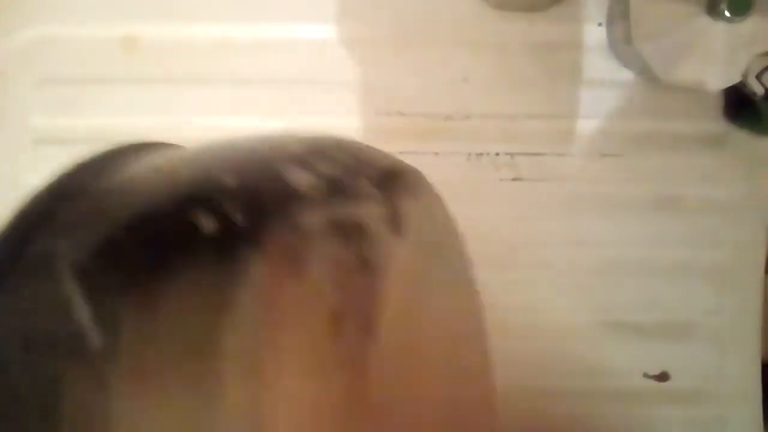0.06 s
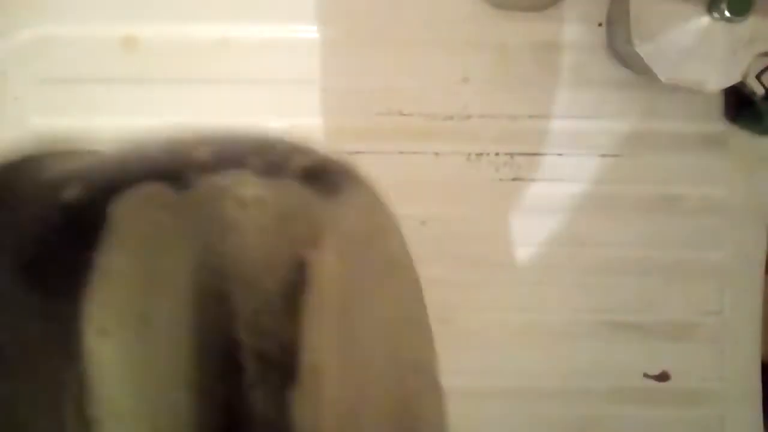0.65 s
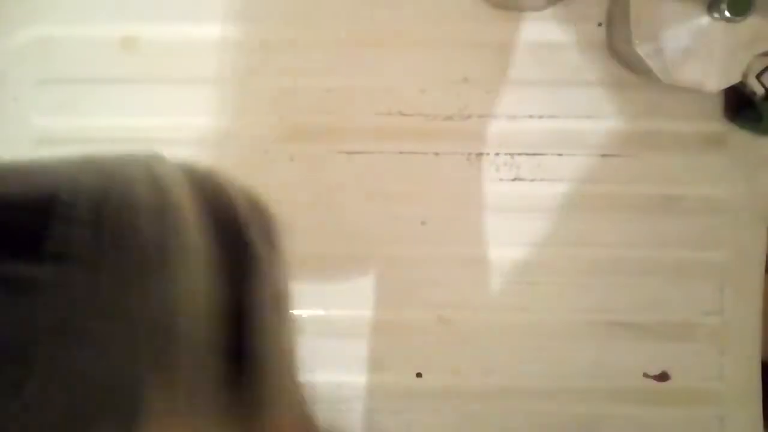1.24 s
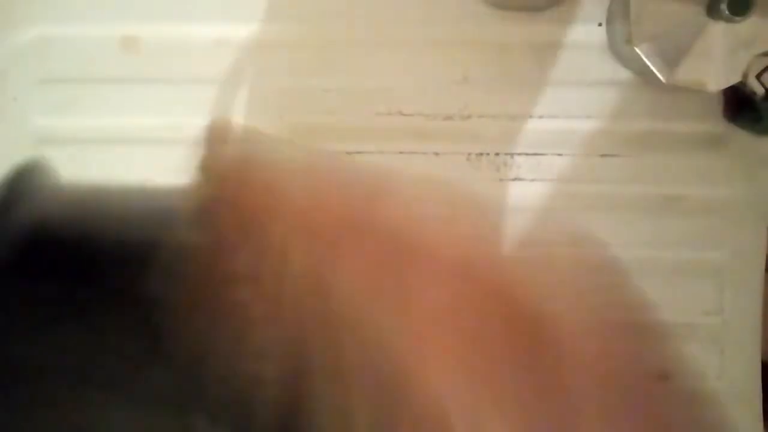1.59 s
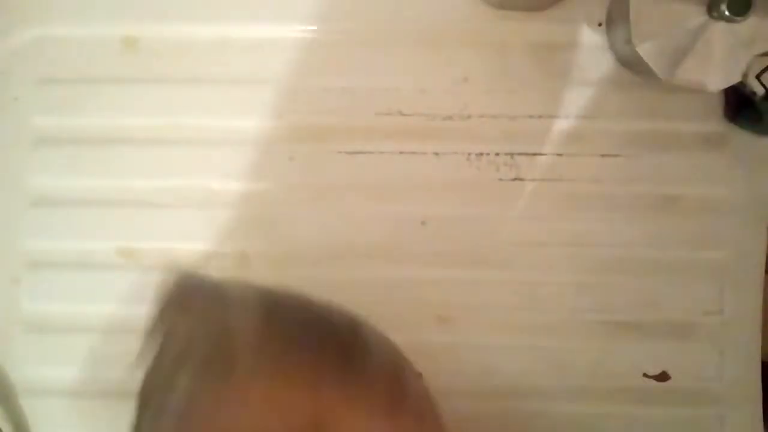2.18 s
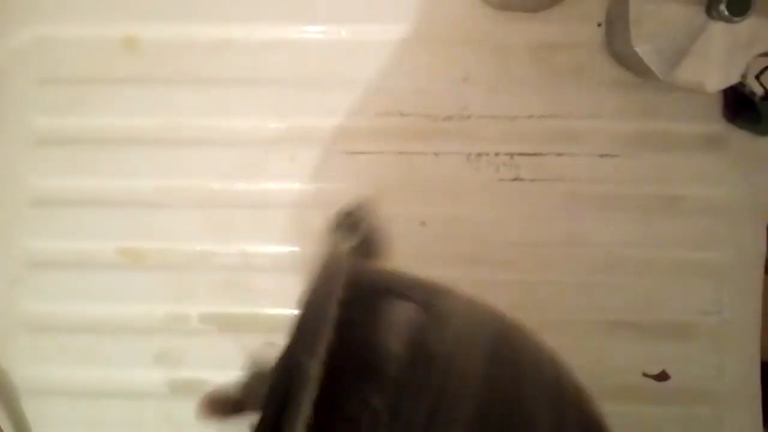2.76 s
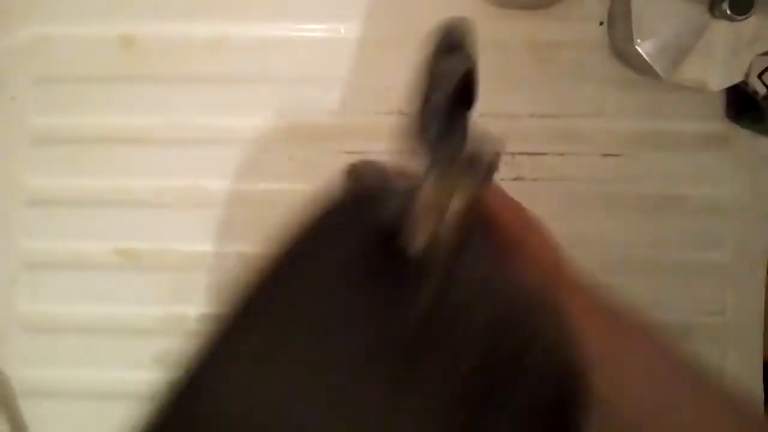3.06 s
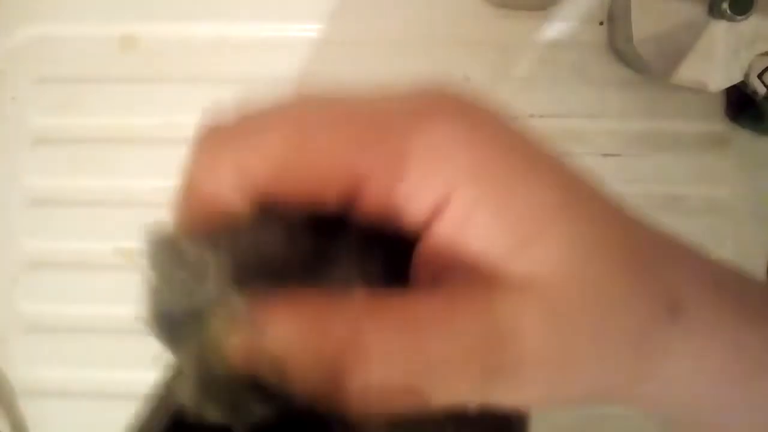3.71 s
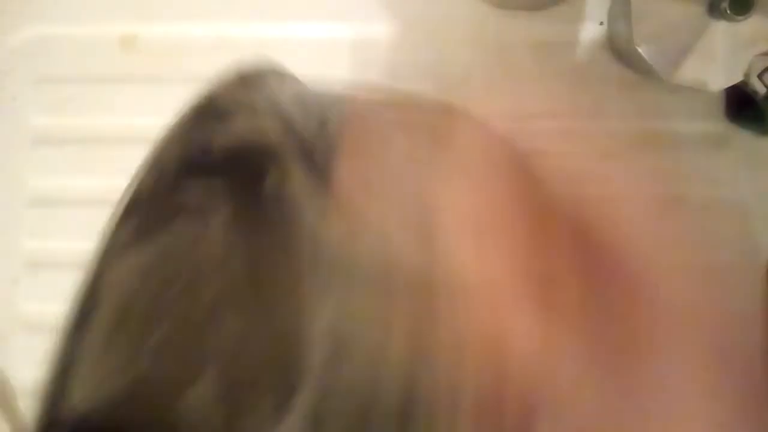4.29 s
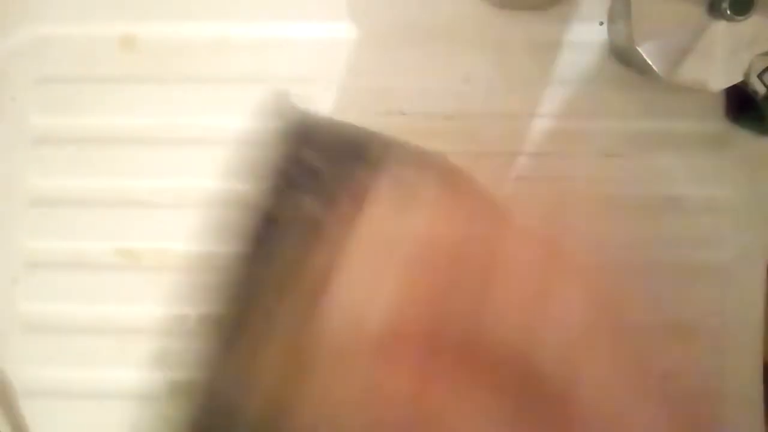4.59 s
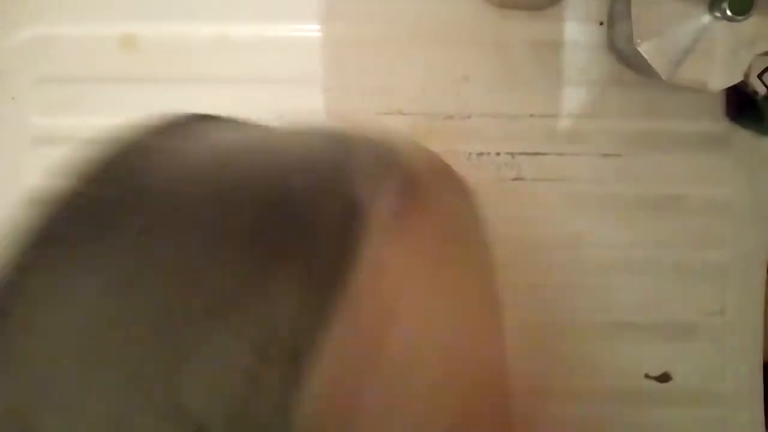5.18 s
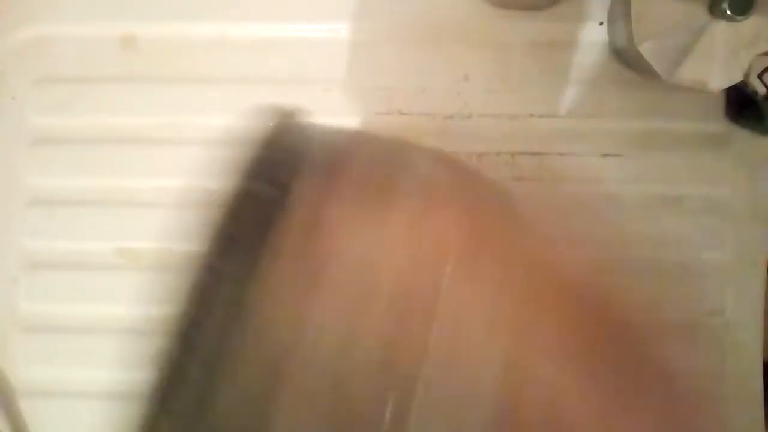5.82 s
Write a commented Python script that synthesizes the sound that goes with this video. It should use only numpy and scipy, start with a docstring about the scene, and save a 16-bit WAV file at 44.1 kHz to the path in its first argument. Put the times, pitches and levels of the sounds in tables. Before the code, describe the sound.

A scouring pad scrubs a wet metal pot in quick, hissing, rasping strokes, drawing a faint hollow hum from it. The pot bumps lightly, the scrubbing eases, and then the pot bangs hard on the sink with a bounce, booming and clattering. The scrubbing resumes, with a few tiny soap bubbles popping, and the pot knocks loudly once more near the end. It is heard up close in a quiet kitchen.

```python
"""Rasping, hissing strokes of a scouring pad on a wet metal pot, over a sink and its ribbed drainer.
The pad's fibres catch and slip, ringing the wall and making the pot's hollow hum; a few suds burst.
The pot is bumped once lightly, knocks hard on the sink with a bounce, and later knocks again.
Each knock rings sink and pot, with a boom and a clatter. Faint room noise lies underneath."""
import sys
import numpy as np
from scipy import signal
from scipy.fft import rfft, irfft, next_fast_len
from scipy.io import wavfile
from scipy.ndimage import uniform_filter1d

SR = 44100
rng = np.random.default_rng(int(sys.argv[2]) if len(sys.argv) > 2 else 0)


def master_out(mix):
    """Clip the mix to full scale and print it as 16-bit PCM to the path in sys.argv[1]."""
    frames = np.transpose(np.atleast_2d(mix))
    ceiling = np.clip(frames, -1, 1)
    pcm = np.round(ceiling * 32767).astype(np.int16)
    wavfile.write(sys.argv[1], SR, pcm)


N = 266805
TIME = np.arange(N) / SR


# pad strokes, each lasting until the next: t/s, hiss level/dB, rasp level/dB, peak position/0-1
PAD_STROKES = [(0.0, -43.5, -52.5, 0.76), (0.199, -44, -50, 0.52), (0.37, -43.5, -53, 0.8),
               (0.572, -44, -52.5, 0.7), (0.765, -45.5, -53.5, 0.43), (1.098, -43.5, -55, 0.28),
               (1.377, -44, -55, 0.65), (1.566, -44.5, -52.5, 0.63), (1.755, -43.5, -50.5, 0.76),
               (1.954, -42, -52, 0.46), (2.152, -42.5, -51, 0.38), (2.565, -51.5, -54, 0.26),
               (2.838, -57, -75, 0.95), (3.094, -55, -66, .33), (3.25, -58.5, -73, 0.15),
               (3.741, -50.5, -56.5, .75), (3.939, -46, -51.5, 0.82), (4.185, -45.5, -53, .65),
               (4.394, -47, -53, 0.65), (4.565, -43.5, -51, 0.5), (4.721, -45, -50.5, 0.6),
               (4.898, -42.5, -50.5, 0.82), (5.08, -42.5, -49, 0.34), (5.37, -43.5, -52.5, 0.56),
               (5.602, -44.5, -54, 0.5), (5.784, -43, -55.5, 0.25)]

def strokes(end_s=6.18, roundness=1.02, turn_follows=0.6):
    """Pad speed and pressure, as gains: they arch over each stroke and drop where the hand turns."""
    start_s, hiss_db, rasp_db, peak_position = np.transpose(PAD_STROKES)
    progress = np.interp(TIME, np.append(start_s, end_s), np.arange(len(start_s) + 1))
    stroke = np.minimum(progress.astype(int), len(start_s) - 1)
    position = progress - stroke
    peak_at = np.clip(peak_position, 0.05, 0.95)[stroke]
    triangle = np.minimum(position / peak_at, (1 - position) / (1 - peak_at))
    swell = np.sin(np.pi / 2 * triangle) ** roundness

    def arch(peak_db, turn_db):
        vigour_db = uniform_filter1d(peak_db, size=2) - peak_db.mean()  # both strokes at a turn
        turn_gain = from_db(turn_db + turn_follows * np.interp(TIME, start_s, vigour_db))
        return turn_gain + swell * (from_db(peak_db[stroke]) - turn_gain)

    return arch(hiss_db, turn_db=-54.5), arch(rasp_db, turn_db=-59.5)


def fibres(rate_hz, spread_db, clump_db):
    """Fibres catch and let go at random, in clumps; rms 1."""
    sizes = from_db(spread_db * np.minimum(rng.exponential(1, N), 4)) * rng.choice([-1, 1], N)
    slips = rng.random(N) < rate_hz / SR
    return unit_rms(sizes * slips / np.sqrt(rate_hz) * from_db(clump_db * drift(130)))


# spectra of the pad on the wall: f/Hz, level/dB
HISS_SPECTRUM = [(2200, -19.5), (3500, -14), (4700, -8), (5600, -6), (6550, -1.5), (7100, -6), (7700, -15),
                 (8400, -23), (10000, -27.5), (12000, -36), (14000, -36), (15500, -26)]
RASP_SPECTRUM = [(200, -29), (380, 6), (620, -5.5), (780, -16), (1100, 3.5), (1550, 5.5), (2000, 5),
                 (2500, 5.5), (3500, 2), (5500, -25.5)]
# upper modes of the pot wall: f/Hz, level/dB, t60/s
POT_HIGH_MODES = [(958.5, 0, 0.12), (1400, -1.5, 0.043), (1531, 0.5, 0.096), (1637, 1, 0.11),
                  (2350, -23, 0.042), (3480, -25, 0.15), (5686, 14.5, 0.028), (6100, 8.5, 0.11),
                  (6620, 10, 0.046)]

def scrubbing():
    """Faster strokes free more fibres, which hiss and ring the wall; pressure makes it rasp."""
    speed, pressure = strokes()
    rate_hz = 6500 * np.sqrt(speed / speed.max())
    hiss = colour(fibres(rate_hz, spread_db=1.0, clump_db=0.6), HISS_SPECTRUM)
    hiss = moving_echoes(hiss, echo_db=-6, t60_s=0.02)
    rasp = colour(fibres(rate_hz, spread_db=2.5, clump_db=1.34), RASP_SPECTRUM)
    rasp = moving_echoes(rasp, echo_db=-1.5, t60_s=0.05)
    force = fibres(rate_hz, spread_db=4.0, clump_db=2.5)
    # each mode swells and fades as the pad moves over the wall
    rings = unit_rms(sum(from_db(db + 1.1 * drift(8)) * ring(force, hz, t60_s)
                         for hz, db, t60_s in POT_HIGH_MODES))
    return speed * (from_db(-1.03) * hiss + from_db(-8) * rings) + pressure * from_db(-1) * rasp


def moving_echoes(x, echo_db, t60_s, drift_hz=8, count=5):
    """Adds short echoes between hand, pot and sink, shifting as the hand moves; rms 1."""
    t = TIME[:SR // 4]
    patterns = rng.standard_normal((count, len(t))) * decay(t, t60_s)
    weights = np.array([drift(drift_hz) for _ in patterns])
    weights /= np.linalg.norm(weights, axis=0)  # constant total power
    echoes = sum(weight * signal.fftconvolve(x, pattern)[:N]
                 for weight, pattern in zip(weights, patterns))
    return unit_rms(unit_rms(x) + from_db(echo_db) * unit_rms(echoes))


# drags of the pad under the cupped hand: t/s, f/Hz, level/dB
PAD_DRAGS = [(0.287, 1500, -53.5), (0.705, 1400, -52), (1.67, 1590, -55.5), (1.815, 2350, -49.5),
             (2.242, 1360, -55), (2.66, 1620, -57.5), (4.5, 1550, -54.5), (4.63, 1520, -52.5),
             (4.95, 1400, -51.5), (5.722, 1510, -49)]

def drags(t60_s=0.0055):
    """Coarse slips sound the air pocket between hand and wall: a hollow rasp."""
    slips = fibres(2500, spread_db=2.0, clump_db=1.0)
    rasp = np.zeros(N)
    for at_s, hz, db in PAD_DRAGS:
        pocket = ring(ring(slips, hz, t60_s), hz, t60_s)
        rasp += from_db(db) * bell_curve(at_s, half_width_s=0.05) * unit_rms(np.diff(pocket, prepend=0))
    return rasp


# pitch of the pot's hollow as it tilts: t/s, f/Hz
CAVITY_PITCH = [(0, 164.5), (1.1, 164.2), (1.55, 156.6), (2.15, 164.4), (2.45, 145), (2.94, 178.6),
                (4.38, 183), (4.75, 210.6), (4.98, 175)]
# hum of the hollow: t/s, level/dB
CAVITY_LEVEL = [(.04, -46.5), (.22, -61), (.52, -51), (.83, -59), (1.06, -50.5), (1.78, -62), (2.45, -49.5),
                (2.78, -63.5), (2.94, -51), (3.2, -58.5), (3.88, -51), (4.18, -68), (4.38, -55), (4.7, -62),
                (4.98, -51), (5.45, -66.5)]
# low modes of the pot wall, hand-damped, also rung by knocks: f/Hz, level/dB, t60/s
POT_LOW_MODES = [(381.6, 0.5, 0.074), (433, -8.5, 0.18), (508.5, 6.5, 0.15), (556.7, 1, 0.24),
                 (1420, -31, 0.216)]

def pot_hum(half_width_hz=9):
    """Friction drives the air in the pot, whose pitch follows the tilt, and the wall's low modes."""
    _, pressure = strokes()
    friction = fibres(1500, spread_db=1.5, clump_db=1.5)
    carrier = np.exp(2j * np.pi * np.cumsum(curve(CAVITY_PITCH)) / SR)
    pole = np.exp(-2 * np.pi * half_width_hz / SR)
    air = (signal.lfilter([1], [1, -2 * pole, pole * pole], friction / carrier) * carrier).real
    wall = unit_rms(body(friction, POT_LOW_MODES))
    rubbing = from_db(-62) * (pressure / pressure.mean()) ** 0.15
    sliding = from_db(-44.5) * bell_curve(2.412, half_width_s=0.17)  # pot slides on the drainer
    return from_db(curve(CAVITY_LEVEL)) * unit_rms(air) + (rubbing + sliding) * wall


# blows of the pot: t/s, sink level/dB, pot level/dB, crack level/dB, tail level/dB,
# contact low-pass f/Hz, boom f/Hz, boom level/dB
POT_KNOCKS = [(2.378, -50, -34.5, -16.5, -36, 600, 147, -42),
              (2.39, -50.5, -41, -17.5, -54, 7000, 164, -52), (3.3363, -24, -27, 0.5, -13, 11000, 262, -22),
              (3.4063, -21.5, -37, 0.5, -11, 3660, 254, -25.5),
              (5.7327, -32.5, -31, -1, -18.5, 1550, 225, -24)]
# modes of the sink: f/Hz, level/dB, t60/s
SINK_MODES = [(62, -14, .8), (73, -7, .85), (104, -1.5, .75), (120, -8, .95), (172, -10, .7),
              (194.5, -7, .8), (286, -11, .5), (385, -8, .5), (427, -6, .45), (538, 3.5, .45),
              (554, -4.5, .4), (668, -6, .5), (698, -11, .4), (782, -14, .45), (926, -9, .45),
              (1014, -9, .45), (1060, -12, .4), (1168, -15, .4), (1550, -15, .4), (1908, -15, .35),
              (2082, -18, .4)]
# filter on crack and tail: f/Hz, level/dB
CLATTER_SPECTRUM = [(25, -8), (42, -7.5), (70, 1), (140, 1), (300, -1), (600, -1), (1000, -5), (1500, -7.5),
                    (2000, -8), (2600, -11), (4000, -13), (4900, -15.5), (6400, -2), (7300, -15.5),
                    (8500, -29.5), (13000, -59.5)]

def knocks():
    """Each blow rings sink and pot; the spot struck sets the boom, a soft contact dulls the clatter."""
    sink, pot_force, rattle = np.zeros((3, N))
    for at_s, sink_db, pot_db, crack_db, tail_db, contact_hz, boom_hz, boom_db in POT_KNOCKS:
        sink *= decay(np.maximum(TIME - at_s, 0), t60_s=0.044)  # new contact damps the old ringing
        sink += body(impulse(at_s, sink_db), SINK_MODES)
        sink += ring(impulse(at_s, boom_db), boom_hz, t60_s=0.42)
        pot_force += impulse(at_s, pot_db)
        pole = np.exp(-2 * np.pi * contact_hz / SR)
        rattle += signal.lfilter([1 - pole], [1, -pole], clatter(at_s, crack_db, tail_db))
    return sink + body(pot_force, POT_LOW_MODES) + colour(rattle, CLATTER_SPECTRUM)


# decay of the clatter's tail: f/Hz, t60/s
TAIL_DECAY = [(60, 0.96), (300, 0.85), (1000, 0.93), (3000, 0.62), (7000, 0.56), (14000, 0.39)]

def clatter(at_s, crack_db, tail_db, rise_s=0.0013):
    """A short crack, then the crowded modes of sink and kitchen, the treble dying first."""
    t, hz = TIME[:SR], np.arange(SR // 2 + 1)
    spectrum = rfft(rng.standard_normal(SR))
    edges_hz = np.append(0, np.geomspace(100, SR / 2, 9))
    tail = np.zeros(SR)
    for low_hz, high_hz in zip(edges_hz, edges_hz[1:]):
        band = irfft(spectrum * (hz >= low_hz) * (hz < high_hz), SR)
        tail += band * decay(t, at_hz(TAIL_DECAY, (low_hz + high_hz) / 2))
    crack = rng.standard_normal(SR) * decay(t, t60_s=0.046)
    burst = (from_db(crack_db) * crack + from_db(tail_db) * tail) * np.minimum(t / rise_s, 1)
    return np.pad(burst, (round(at_s * SR), N))[:N]


# bursting soap bubbles: t/s, level/dB, f/Hz, t60/s
BUBBLES = [(3.7465, -36, 5200, 0.01), (4.588, -31, 5160, 0.0099), (5.541, -20, 5530, 0.0063)]

def suds(rise_s=0.00087):
    """Small bubbles burst with a brief high ping."""
    return sum(ring(impulse(at_s, db), hz, t60_s) * np.clip((TIME - at_s) / rise_s, 0, 1)
               for at_s, db, hz, t60_s in BUBBLES)


# background spectrum: f/Hz, level/dB
FLOOR_SPECTRUM = [(25, -32), (52, 6.5), (85, -6), (125, 4.5), (260, -9.5), (800, -18.5), (3000, -17),
                  (6500, -21), (8500, -39), (13800, -40.5), (14600, -26), (15500, -30)]

def noise_floor(rms_db=-55.5):
    """Steady room and microphone noise."""
    return from_db(rms_db) * unit_rms(colour(rng.standard_normal(N), FLOOR_SPECTRUM))


def from_db(db):
    """Decibels to gain."""
    return 10 ** (np.asarray(db) / 20)


def unit_rms(x):
    """Scaled to rms 1."""
    return x / np.sqrt(np.mean(x ** 2) + 1e-20)


def curve(points):
    """(t/s, value) points interpolated at every sample."""
    return np.interp(TIME, *np.transpose(points))


def at_hz(points, hz):
    """(f/Hz, value) points interpolated on a log-frequency axis."""
    points_hz, values = np.transpose(points)
    return np.interp(np.log(hz + 1e-9), np.log(points_hz), values)


def colour(x, spectrum):
    """Minimum-phase filter with the given spectrum."""
    size = next_fast_len(N + SR // 2) * 2
    hz = np.arange(size // 2 + 1) * SR / size
    cepstrum = irfft(np.log(from_db(at_hz(spectrum, hz))))
    cepstrum[1:size // 2] *= 2
    cepstrum[size // 2 + 1:] = 0
    return irfft(rfft(x, size) * np.exp(rfft(cepstrum)))[:N]


def drift(rate_hz):
    """Random wander; rms 1."""
    knots = rng.standard_normal(4096)
    return unit_rms(np.interp(TIME * rate_hz, np.arange(len(knots)), knots))


def ring(force, hz, t60_s):
    """One mode: a unit impulse starts a decaying sine of height 1."""
    radius, angle = decay(1 / SR, t60_s), 2 * np.pi * hz / SR
    return signal.lfilter([0, np.sin(angle)], [1, -2 * radius * np.cos(angle), radius ** 2],
                          force + 1e-18)


def body(force, modes):
    """Modes in parallel, with alternating signs."""
    return sum((-1) ** k * from_db(db) * ring(force, hz, t60_s)
               for k, (hz, db, t60_s) in enumerate(modes))


def impulse(at_s, db):
    """A one-sample click."""
    return from_db(db) * (np.arange(N) == round(at_s * SR))


def decay(t, t60_s):
    """Fall of 60 dB per t60_s."""
    return from_db(-60 * t / t60_s)


def bell_curve(at_s, half_width_s):
    """Gaussian rise and fall."""
    return np.exp(-2 * ((TIME - at_s) / half_width_s) ** 2)


def scene():
    """Scouring, knocks and suds in a quiet kitchen; mono."""
    background = noise_floor()
    scouring = scrubbing() + drags() + pot_hum()
    return (scouring + knocks() + suds() + background)[None]


def record(dry):
    """Soft peak limiting, then a steep low-pass."""
    ceiling, cutoff_hz = 1.5, 15500
    low_pass = signal.ellip(10, 0.1, 80, cutoff_hz, fs=SR, output="sos")
    return signal.sosfilt(low_pass, ceiling * np.tanh(dry / ceiling))


dry = scene()
out = record(dry)
master_out(out)
```